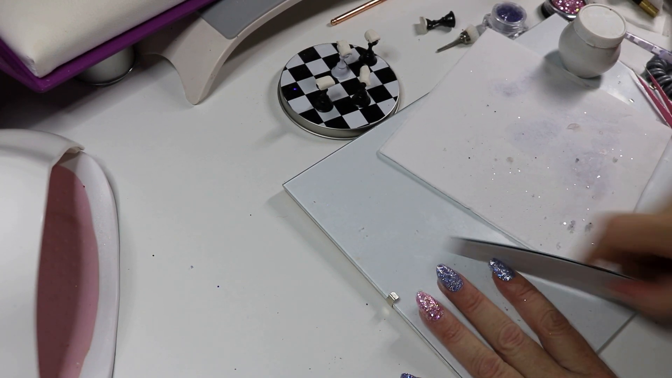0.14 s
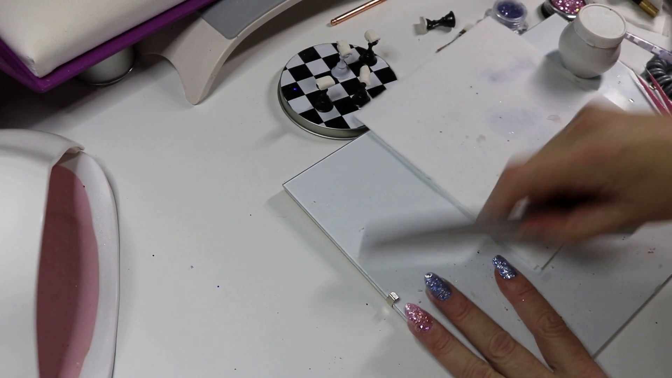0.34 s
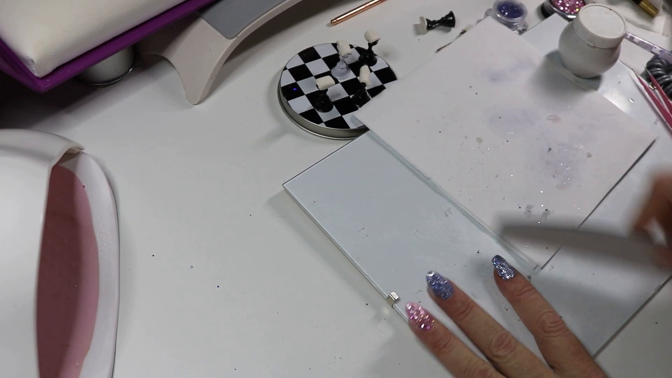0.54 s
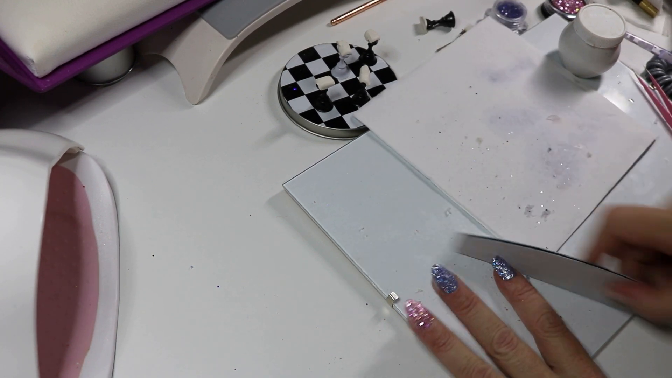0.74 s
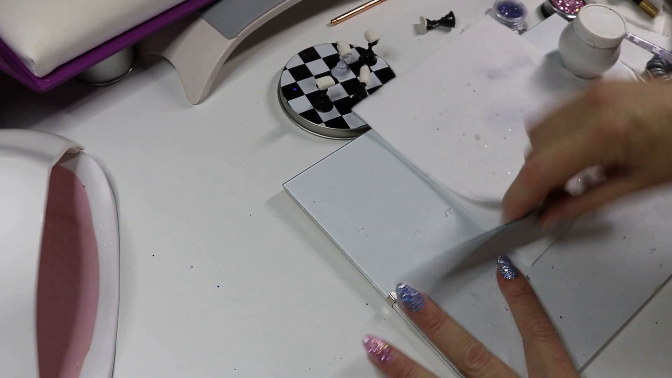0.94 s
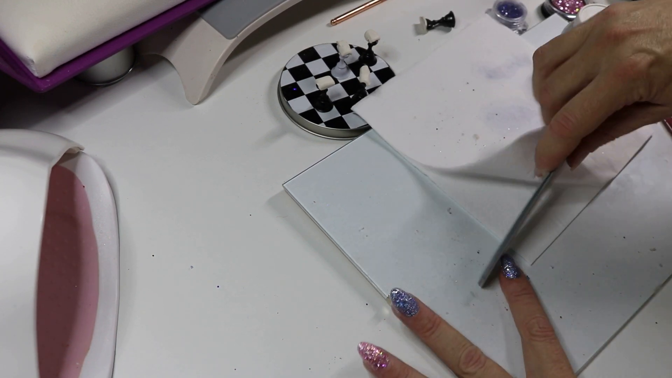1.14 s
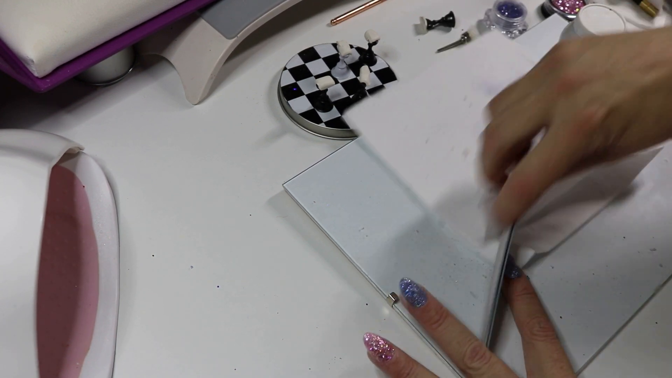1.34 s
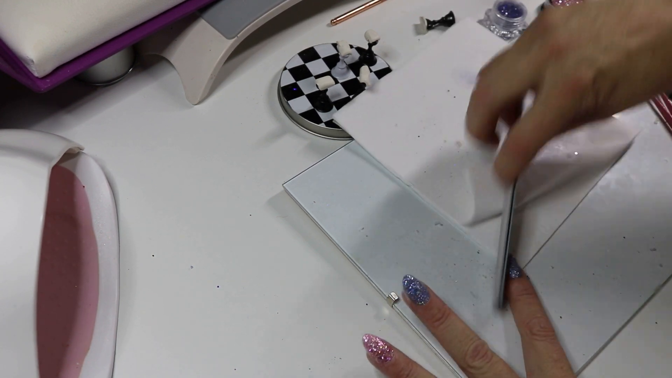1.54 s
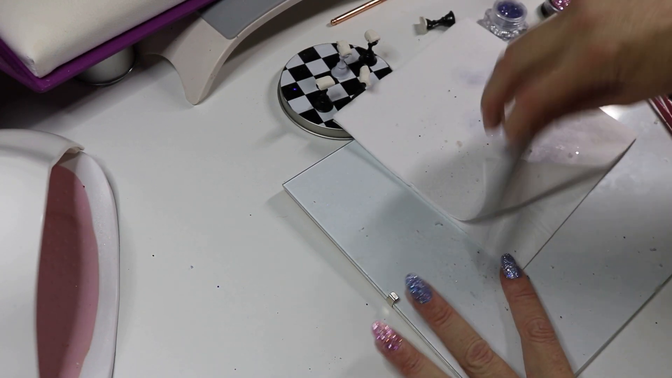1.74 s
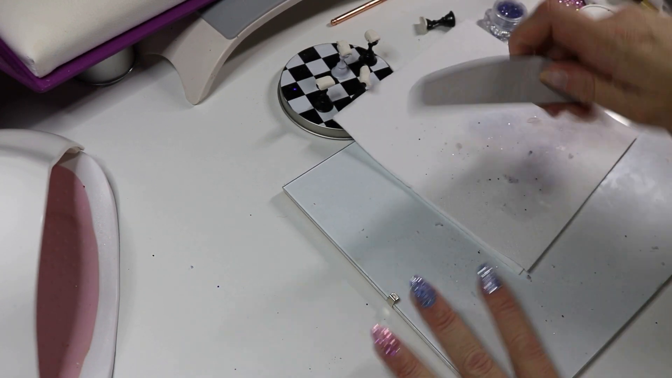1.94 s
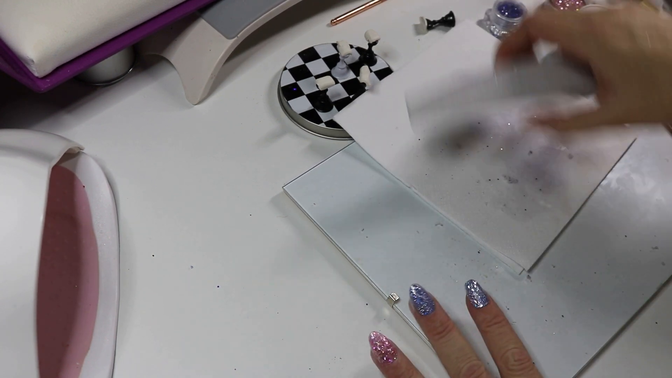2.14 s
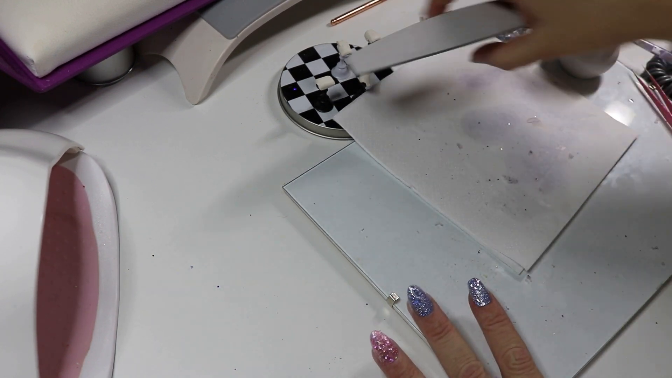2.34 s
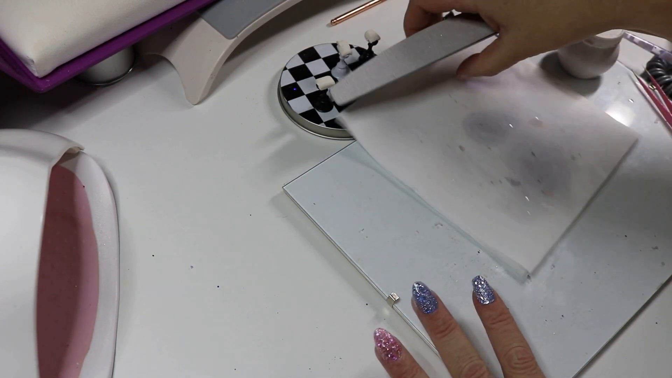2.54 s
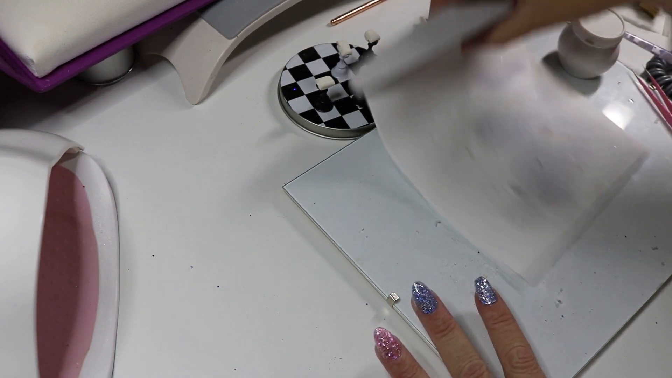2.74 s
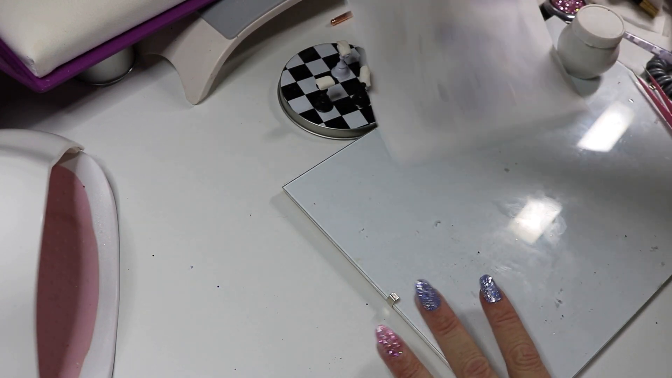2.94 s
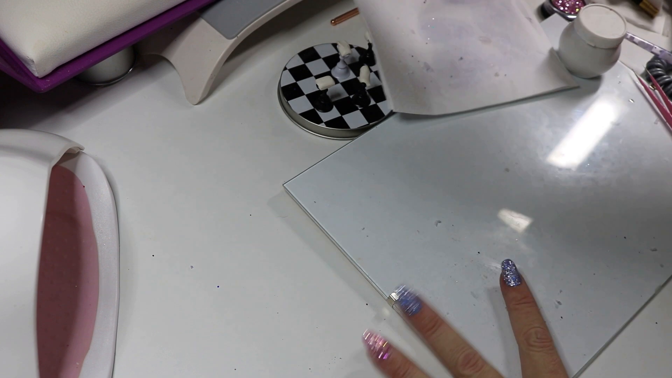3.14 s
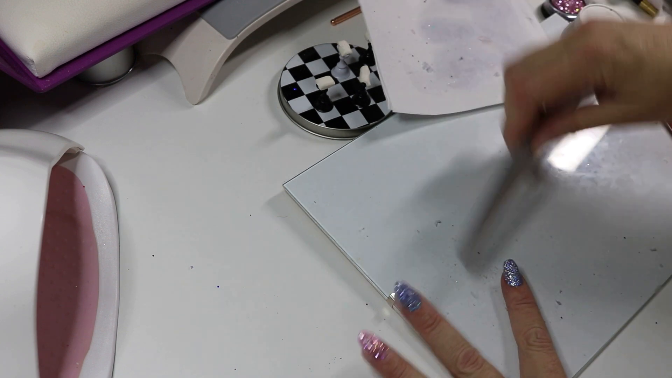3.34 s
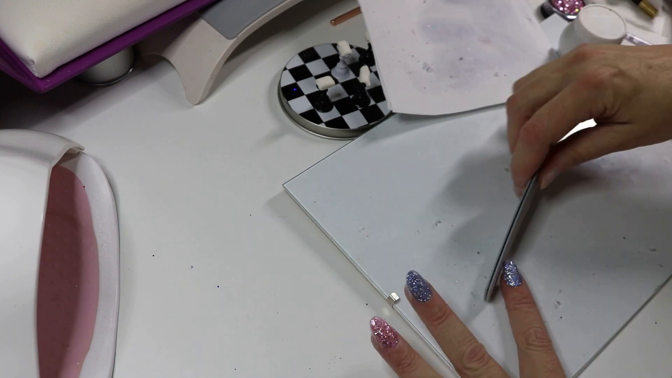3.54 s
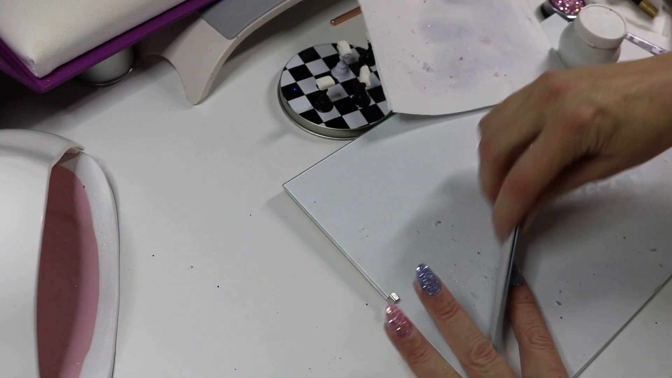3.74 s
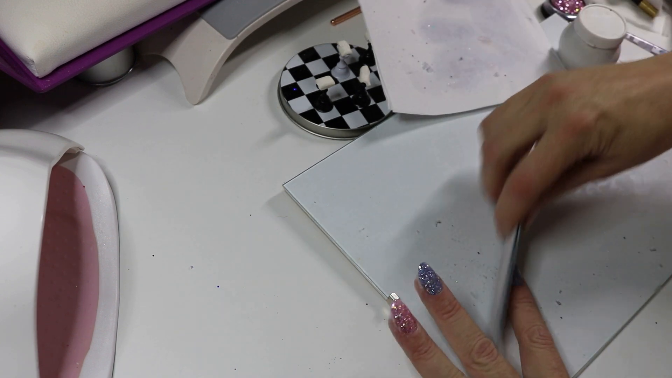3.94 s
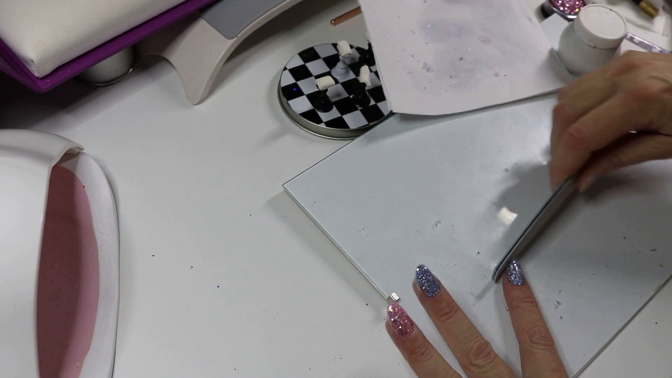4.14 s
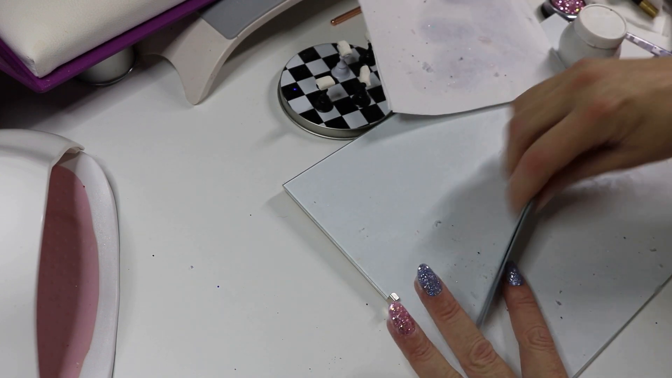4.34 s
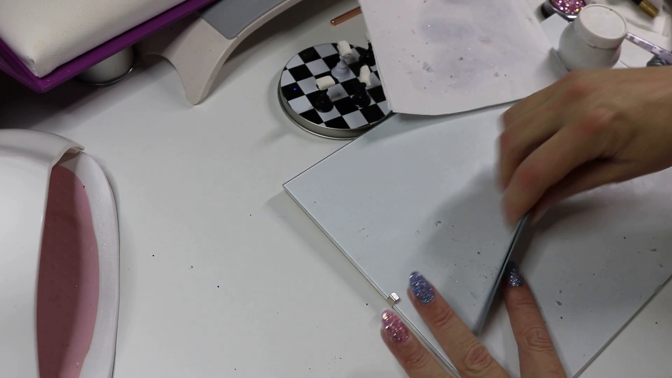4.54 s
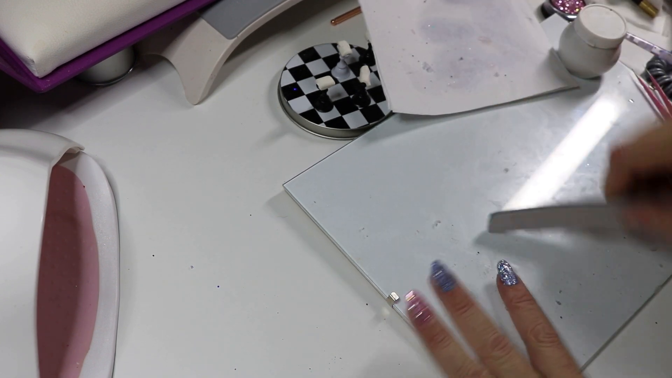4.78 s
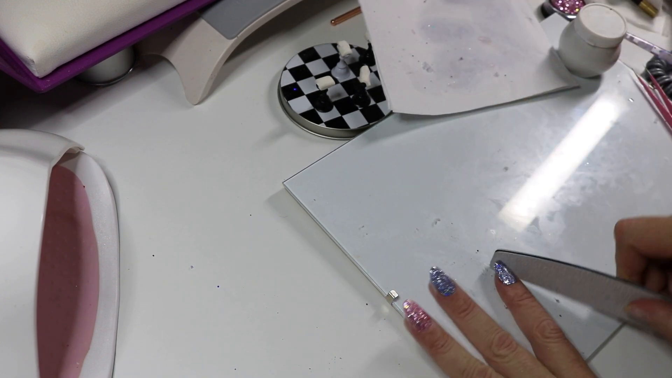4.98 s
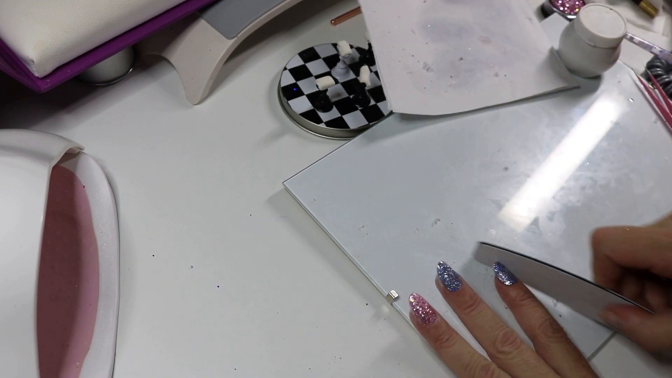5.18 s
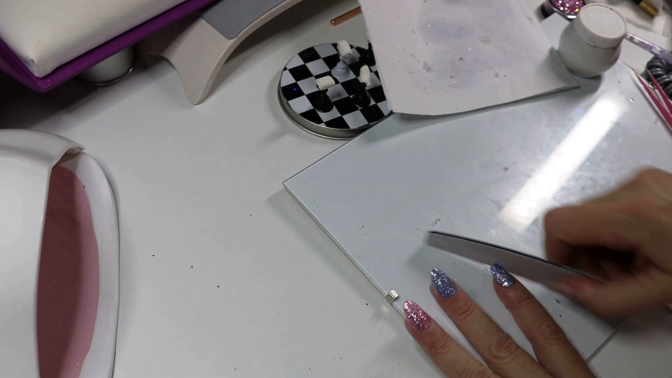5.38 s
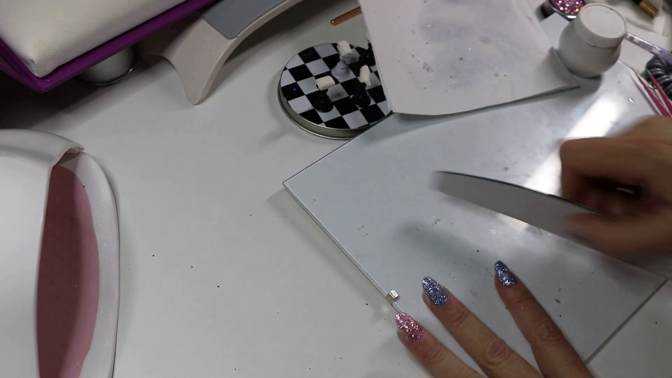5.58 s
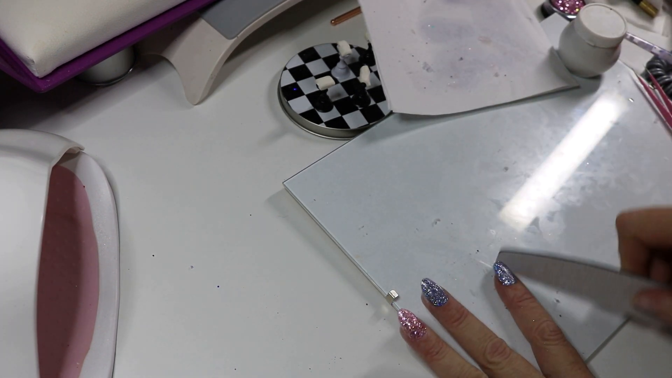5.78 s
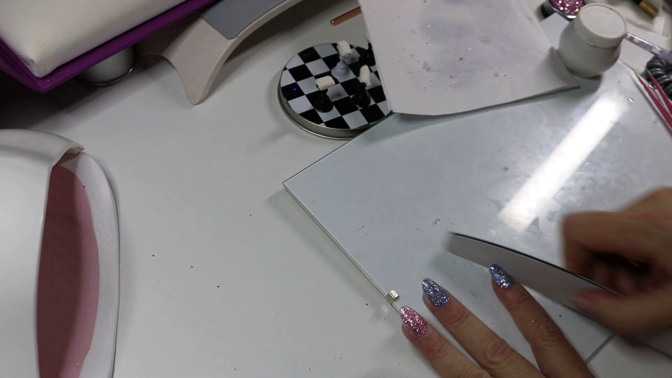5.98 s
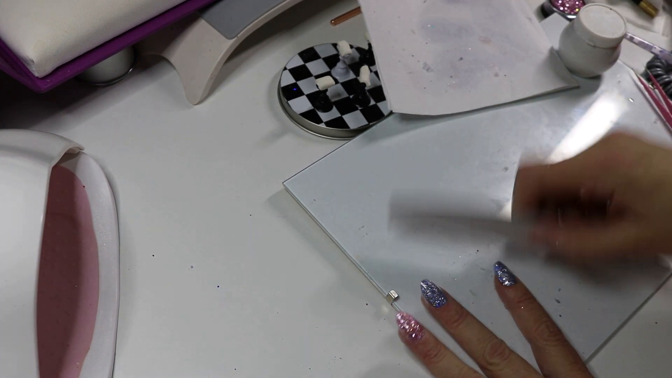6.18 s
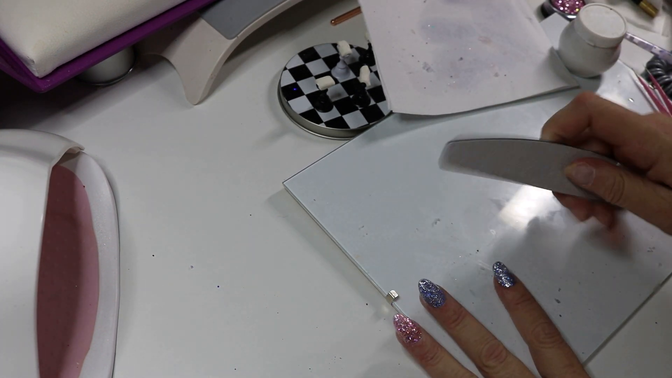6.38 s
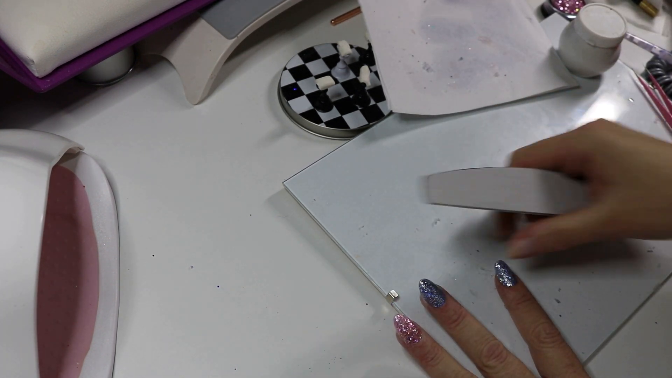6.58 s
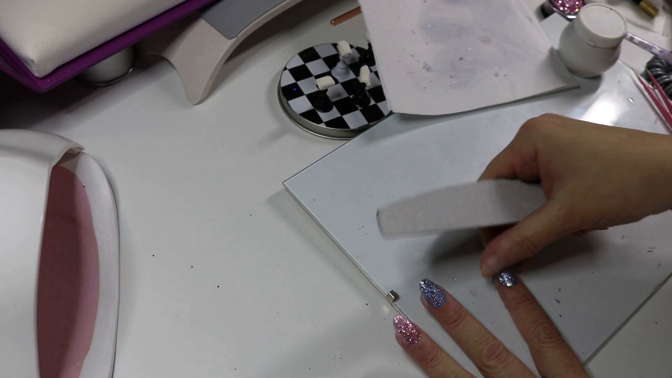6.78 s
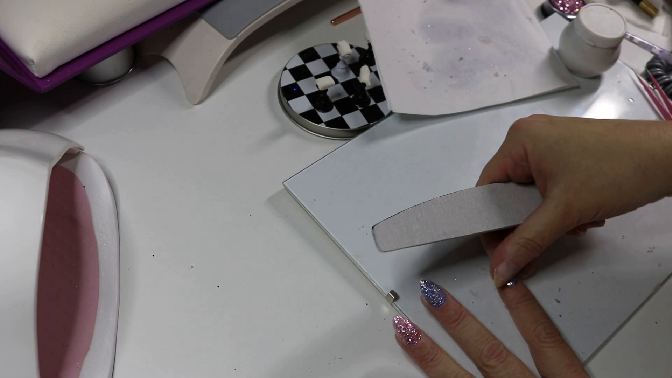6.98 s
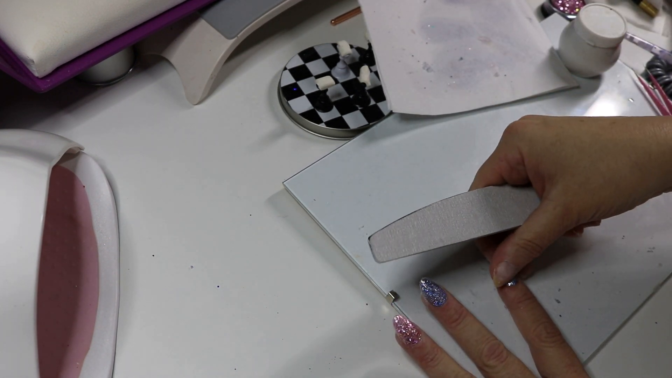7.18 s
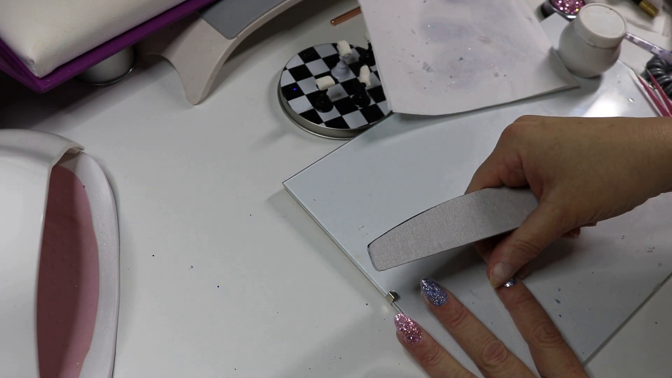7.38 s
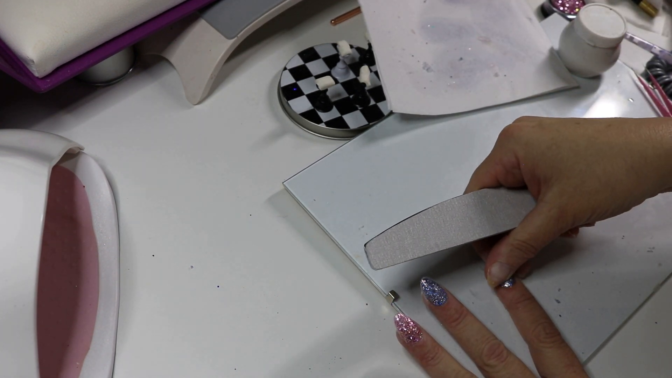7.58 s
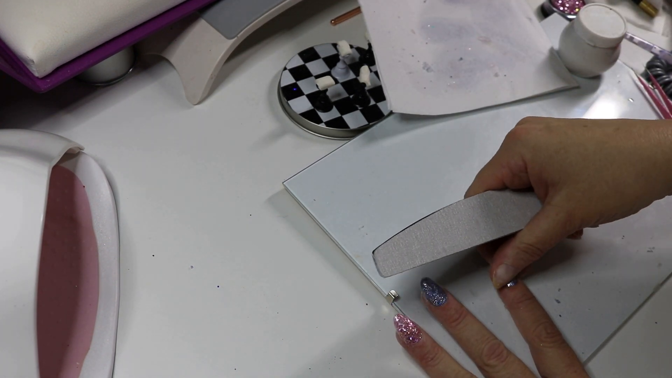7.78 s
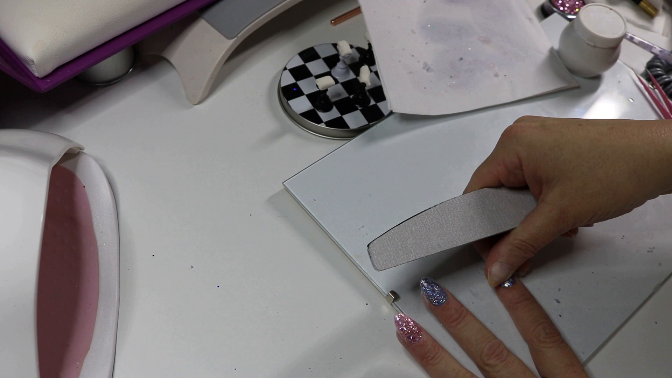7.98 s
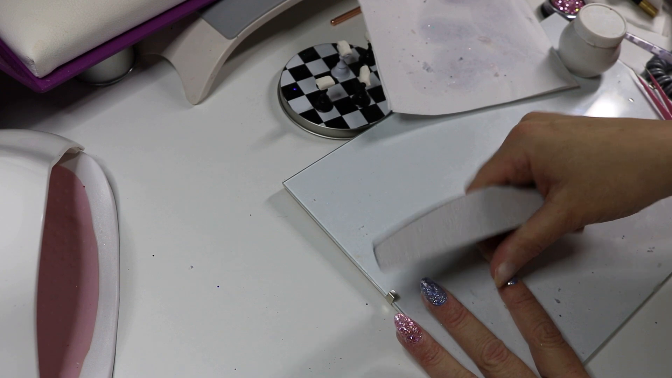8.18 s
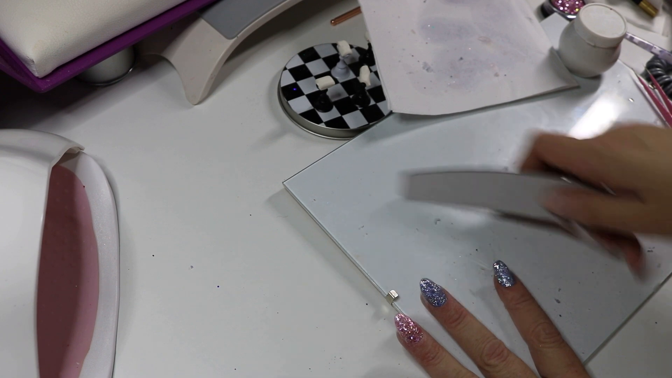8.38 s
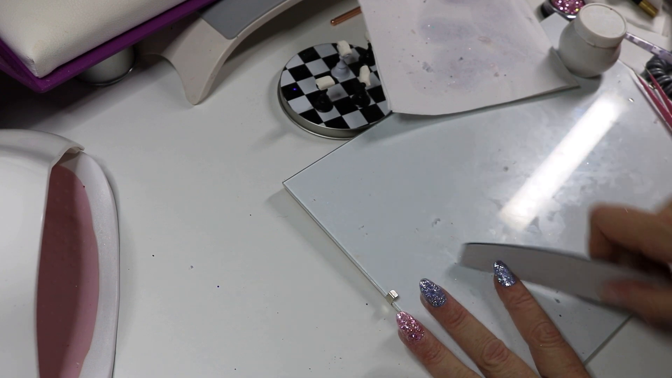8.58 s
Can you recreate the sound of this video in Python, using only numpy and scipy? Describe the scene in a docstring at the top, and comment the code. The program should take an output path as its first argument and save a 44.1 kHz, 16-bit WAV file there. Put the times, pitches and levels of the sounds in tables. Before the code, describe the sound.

Close up in a small room, a coarse hand file scrapes artificial nails in short, quick strokes, with sharp clicks and low knocks through a glass-topped table. A tiny squeak chirps near the start. A paper towel crackles as it is pushed away, more filing follows, then light airy flicks and a long pause in steady hiss before a last few clicks and scrapes.

```python
"""A gritty hand file is drawn over acrylic nails on a glass-topped table: random grain impulses make the scratch.
Coarser slips and single blows ring the modes of the table; snaps are clicks and bursts through resonances.
The file squeaks once as a gliding harmonic tone; a paper towel and light flicks are coloured grain noise.
Behind them lie a steady room hiss and a low hum that swells late. Two ports hear direct sound and reflections,
and a gain control slightly lowers everything after loud moments."""
import sys
import numpy as np
from scipy import signal
from scipy.fft import rfft, irfft, next_fast_len
from scipy.io import wavfile
from scipy.ndimage import uniform_filter1d

SR = 44100
rng = np.random.default_rng(int(sys.argv[2]) if len(sys.argv) > 2 else 0)


def wrap_up_sound(samples):
    """Save the sound to the file named by the first command line argument, as 16-bit audio."""
    columns = np.atleast_2d(samples).T
    # keep every value between -1 and 1, then stretch to whole-number steps
    tamed = np.clip(columns, -1, 1)
    steps = np.round(tamed * 32767).astype(np.int16)
    wavfile.write(sys.argv[1], SR, steps)


N = 380141  # length [samples]

# File strokes: (start [s], length [s], rise [s], fall [s], level change along the stroke [dB],
# scratch level [dB], fizz level [dB], push on the table before coupling [dB],
# knocking in the file before coupling [dB], resonance of the file body [Hz])
STROKES = [(0.0, 0.086, 0.0013, 0.092, -11, -42.5, -44, -43.5, -37.5, 413),
           (.12, 0.26, 0.083, 0.031, -1.5, -40, -41.5, -45.5, -39, 537),
           (.41, 0.32, 0.045, 0.053, -10, -72, -82, -60.5, -60, 500),
           (.7, 0.25, 0.077, 0.017, -4, -40, -41.5, -47, -45, 490),
           (.96, 0.27, 0.035, 0.24, 3.5, -33.5, -40.5, -40.5, -41.5, 530),
           (1.24, 0.24, 0.065, 0.086, -11, -38.5, -45.5, -38.5, -34, 480),
           (1.49, 0.23, 0.055, 0.13, -8, -40, -48, -48, -50, 490),
           (1.77, 0.07, 0.015, 0.011, -5, -45.5, -51.5, -71, -69, 510),
           (1.855, 0.076, 0.018, .03, -17, -55, -54.5, -70, -70, 500),
           (1.935, 0.14, 0.018, 0.12, -8, -42.5, -44.5, -45, -50, 547),
           (3.56, 0.34, 0.12, 0.14, 7.5, -43.5, -50.5, -42, -35.5, 500),
           (3.94, 0.3, 0.052, 0.14, -6.5, -44, -48, -45.5, -43.5, 470),
           (4.265, .25, 0.075, 0.075, -7, -43.5, -48, -39.5, -36.5, 451),
           (4.53, 0.218, 0.053, 0.069, 12, -43.5, -47.5, -42.5, -41, 458),
           (4.79, 0.085, 0.032, 0.027, -1, -48, -47, -74, -51.5, 505),
           (5.15, 0.39, 0.036, 0.028, 9, -52.5, -57, -53.5, -46.5, 570),
           (5.87, 0.39, 0.15, 0.063, -8, -47, -48.5, -49, -46.5, 573),
           (8.38, 0.047, 0.016, .015, 0, -58, -48.5, -78, -71, 470),
           (8.49, 0.083, 0.018, .03, 4, -49.5, -50.5, -43.5, -61, 433),
           (8.59, 0.036, .012, .02, -3, -37.5, -53, -60, -56, 445)]
# Treble spectrum of fine grains, for file and paper: (frequency [Hz], relative density [dB per Hz])
FIZZ = [(3000, -69.5), (5000, -37), (6500, -4.5), (8000, 7), (9800, 7.5), (12000, 0), (14500, -7),
        (16000, -15)]


def gain_of(db):
    """Level law: an amplitude ratio is ten to the power of decibels over 20."""
    return 10 ** (np.asarray(db) / 20)


def evened(x):
    """Normalization: scales a signal to rms 1."""
    return x / np.sqrt(np.mean(x ** 2) + 1e-20)


def read(points, hz):
    """Log-frequency interpolation: reads a tabulated spectrum at any frequency."""
    f, value = np.transpose(points)
    return np.interp(np.log(hz + 1), np.log(f + 1), value)


def add(mix, s, sound):
    """Superposition: adds a sound into the mix at s seconds."""
    part = mix[round(s * SR):][:len(sound)]
    part += sound[:len(part)]


def filtered(x, gain):
    """Linear filtering: multiplies the spectrum by gain(hz)."""
    size = next_fast_len(N)
    hz = np.fft.rfftfreq(size, 1 / SR)
    return irfft(rfft(x, size) * gain(hz), size)[..., :N]


def coloured(x, spectrum):
    """Spectral shaping: filters x by a tabulated spectrum, then scales to rms 1."""
    return evened(filtered(x, lambda hz: gain_of(read(spectrum, hz))))


def resonate(x, hz, width):
    """Resonance by heterodyning: shifts hz to zero, smooths over width [Hz] and shifts back; peak gain 1."""
    turn = np.exp(2j * np.pi * np.cumsum(hz * np.ones(x.shape[-1])) / SR)
    r = np.exp(-np.pi * width / SR)
    smooth = signal.lfilter([1 - r], [1, -r], x / turn + 1e-18)
    return 2 * (turn * smooth).real


def level(rows, order, edge=0.83):
    """Amplitude envelope: each row swells, drifts and fades; column order is its level."""
    edge_db = -31 * edge  # level of the ends against the middle
    out = np.zeros(N)
    for row in rows:
        start, length, rise, fall, drift_db = row[:5]
        t = np.arange(0, length, 1 / SR)
        onset = np.clip(1 - t / max(rise, 1e-3), 0, 1) ** 2
        ending = np.clip(1 - (length - t) / max(fall, 1e-3), 0, 1) ** 2
        drift = drift_db * (t / length - .5)
        add(out, start, gain_of(row[order] + edge_db * (onset + ending) + drift))
    return out


def pitch(rows):
    """Moving resonance: the last column [Hz] of the latest row, joined by short glides."""
    rows = np.array(rows)
    latest = np.maximum(np.searchsorted(rows[:, 0], np.arange(N) / SR) - 1, 0)
    return uniform_filter1d(rows[latest, -1], size=800)


def grit(per_s, spread_db, clump_db):
    """Shot noise: grains catch one by one in clumps, a few large; the two rows differ in sign only."""
    clumps = evened(uniform_filter1d(rng.standard_normal(N), size=200))  # some milliseconds long
    size = gain_of(spread_db * np.minimum(rng.exponential(1, N), 5) + clump_db * clumps)
    sign = rng.choice([-1., 1.], (2, N))
    return evened(size * sign * (rng.random(N) < per_s / SR))


def patchy(x):
    """Spectral modulation: a wandering contact tints patches about 2 kHz wide and 40 ms long."""
    z = signal.stft(x, nperseg=256, noverlap=192)[2]
    patches = rng.standard_normal(z.shape[1:])
    patches = uniform_filter1d(uniform_filter1d(patches, size=12, axis=0), size=28, axis=1)
    z = z * gain_of(1.2 * evened(patches))
    return evened(signal.istft(z, nperseg=256, noverlap=192)[1][:, :N])


def room_tone():
    """Partial coherence: steady hiss with a bass partly common to both channels, plus a sinusoidal hum."""
    # Hiss spectrum: (frequency [Hz], relative density [dB per Hz])
    hiss = [(12, -28), (20, -3), (70, -8.5), (93, -10.5), (172, -10), (216, -7), (347, -9), (434, -11.5),
            (624, -12), (678, -12.5), (1220, -14), (1480, -13.5), (1610, -14.5), (9000, -22.5),
            (13500, -28), (16000, -31)]
    # Likeness of the channels: (frequency [Hz], correlation [0 to 1])
    likeness = [(60, 0.52), (180, 0.38), (550, 0.18), (1650, 0), (4970, 0), (15000, 0)]
    # Swelling of the hum: (time [s], level [dB])
    swell = [(7.15, -74), (7.36, -58), (7.63, -77), (8.18, -59), (8.54, -52.5), (8.62, -65)]
    hiss_db, hum_hz = -51.5, 67.5
    left, other = rng.standard_normal((2, N))
    same = lambda hz: np.clip(read(likeness, hz), -1, 1)
    right = filtered(left, same) + filtered(other, lambda hz: np.sqrt(1 - same(hz) ** 2))
    s, db = np.transpose(swell)
    t = np.arange(N) / SR
    hum = gain_of(np.interp(t, s, db, left=-200)) * np.sin(2 * np.pi * hum_hz * t)
    return gain_of(hiss_db) * coloured(np.array([left, right]), hiss) + hum


def paper():
    """Fibre crackle: clumped impulses excite a resonance that moves as the towel slides and folds."""
    # Slides and folds: (start [s], length [s], rise [s], fall [s], level change [dB],
    # rustle level [dB], fizz level [dB], centre [Hz])
    folds = [(2.52, .1, 0.018, 0.018, 3, -53, -64, 3400), (2.618, 0.078, .014, 0.07, -6, -40.5, -53, 3170),
             (2.885, 0.12, 0.062, .01, -3, -43.5, -52.5, 2640),
             (2.995, 0.085, .02, 0.032, 0, -45.5, -68, 2600),
             (3.05, 0.059, .035, .02, 0, -52.5, -50.5, 3240), (3.178, .11, .004, .05, 7, -45.5, -64, 2630),
             (3.28, 0.17, 0.036, 0.11, -4, -57.5, -52.5, 3250)]
    # Rustle spectrum: (frequency [Hz], relative density [dB per Hz])
    rustle_spectrum = [(410, -6.5), (700, -10.5), (1150, -8), (1250, -4), (1590, -4), (2010, -6.5),
                       (2710, -5.5), (4080, -6), (6500, -11.5), (8450, -18), (14300, -120)]
    grains = patchy(grit(per_s=9900, spread_db=1.5, clump_db=1.0))
    rustle = coloured(grains, rustle_spectrum)
    rustle = evened(rustle + 0.56 * evened(resonate(rustle, pitch(folds), 550)))
    return level(folds, order=5) * rustle + level(folds, order=6) * coloured(grains, FIZZ)


def flicks():
    """Light friction: dry passes over the nail hiss, with a narrow resonant scratch from the file edge."""
    # Passes: (start [s], length [s], rise [s], fall [s], level change [dB],
    # hiss level [dB], edge scratch level [dB], edge pitch [Hz])
    passes = [(6.286, 0.089, 0.0027, .01, -16, -43.5, -53, 4170),
              (6.359, 0.047, 0.0034, .02, -4, -46.5, -66, 4660),
              (6.401, 0.062, .015, 0.028, 2, -42.5, -62, 4700),
              (6.471, 0.019, 0.0053, .008, -2, -40.5, -57, 3840),
              (6.492, .02, 0.0055, .01, 3, -50, -60, 4160), (6.53, 0.047, 0.0045, .015, -6, -43, -64, 4460),
              (6.568, .065, .015, .025, 0, -49.5, -56, 3840)]
    # Hiss spectrum: (frequency [Hz], relative density [dB per Hz])
    hiss_spectrum = [(2650, -13), (4500, -2.5), (4700, -3), (7370, -2.5), (9870, 0.5), (14500, -12),
                     (16000, -16)]
    grains = grit(per_s=20000, spread_db=0.5, clump_db=1.5)
    hz = pitch(passes)
    edge = evened(resonate(resonate(grains, hz, 710), hz, 1400))
    hiss = coloured(grains, hiss_spectrum)
    return level(passes, order=5) * hiss + level(passes, order=6) * edge


def snaps():
    """Impulse response: file edge or paper gives a click and a dying burst, both through a resonance."""
    # Snaps: (time [s], peak level [dB], centre [Hz], burst t60 [s], click against burst before filtering [dB])
    events = [(0.352, -24.5, 2160, 0.053, -2), (0.645, -30.5, 6300, 0.09, 13.5),
              (0.6678, -15, 1960, 0.024, 26), (0.7621, -20, 1980, 0.017, 13), (1.066, -18, 4500, 0.06, 5),
              (1.077, -14.5, 3400, 0.05, -1), (1.243, -39, 1500, .02, 16), (1.3927, -21.5, 4260, 0.087, 20),
              (1.491, -25, 1790, 0.049, -2), (1.825, -27, 5240, 0.014, 5), (1.939, -27.5, 2450, 0.018, 11),
              (1.9548, -20.5, 2970, 0.011, 6), (1.9757, -26.5, 3080, 0.011, 9),
              (2.075, -32, 5040, 0.013, 7), (2.0817, -25.5, 5440, 0.014, 4.5),
              (2.543, -37, 3700, 0.0095, 12), (2.5702, -33, 3530, 0.026, 19),
              (2.604, -30.5, 4830, 0.027, 9), (2.6282, -31.5, 3370, 0.042, 8),
              (2.7115, -31.5, 3200, 0.014, 11), (2.8817, -37.5, 2700, .02, 16),
              (3.1781, -18.5, 1840, 0.027, 20), (3.2287, -21, 3270, 0.0085, 10),
              (3.229, -19, 7200, 0.0093, 19), (3.255, -32, 3200, 0.012, 15),
              (3.277, -24.5, 7400, 0.016, 12), (3.4772, -32.5, 2440, 0.009, 9),
              (3.487, -21, 10500, 0.012, 13), (3.646, -19, 10100, .024, 12), (3.7109, -15, 10300, 0.016, 9),
              (3.985, -24.5, 4030, 0.013, 11), (4.0068, -30, 2930, 0.039, 19),
              (4.2698, -35, 2030, 0.014, 22), (4.282, -24, 8050, 0.0086, 16),
              (4.3168, -20, 8000, 0.0095, 21), (4.3934, -22, 9600, 0.02, 9), (4.4854, -36, 3300, 0.013, 12),
              (4.835, -27, 9100, 0.009, 8), (4.849, -22, 9100, 0.01, 9), (4.898, -26.5, 8500, .015, 12),
              (4.962, -30, 8500, 0.025, 9), (5.5882, -29, 9000, 0.013, 10), (6.204, -23, 8800, 0.018, 9),
              (6.695, -40.5, 2500, .01, 14), (8.379, -20.5, 10000, 0.0093, 5.5),
              (8.379, -35, 4300, 0.014, -10), (8.4483, -27, 2190, 0.0081, 11), (8.5244, -38, 2400, .02, 16),
              (8.5403, -23.5, 3460, 0.012, 13)]
    out, t = np.zeros(N), np.arange(3000) / SR
    bursts = rng.standard_normal((len(events), 3000))
    for (s, db, hz, t60, click_db), noise in zip(events, bursts):
        burst = noise * gain_of(-60 * t / t60) * np.minimum(t / .002, 1)
        tone = burst + gain_of(click_db) * (t == 0)
        for relative_width in (0.8, 1.3, 1.3):
            tone = resonate(tone, hz, relative_width * hz)
        add(out, s, gain_of(db) * tone / abs(tone).max())
    return out


def squeak():
    """Stick-slip oscillation: a harmonic tone falls in pitch, the nail tip whistles and the nail resonates."""
    # Glide: (time [s], fundamental [Hz], level before partial weighting [dB], whistle level [dB])
    glide = [(0.936, 1940, -31, -50), (0.941, 1946, -33, -29), (0.947, 1790, -13.5, -15),
             (0.9475, 1520, -18, -29), (0.95, 1298, -10, -32), (0.956, 1330, -14.5, -35),
             (0.96, 1330, -39, -68), (.964, 1330, -42, -60)]
    # Partials: (multiple of the fundamental, relative level [dB])
    partials = [(1, -9.5), (2, -21), (3, -38), (4, -39)]
    # Nail resonances: (frequency [Hz], width [Hz], gain [dB])
    nail = [(1330, 50, 8), (2630, 620, 12.5), (6300, 2000, 11)]
    whistle_hz = 4260
    s, hz, db, whistle_db = np.transpose(glide)
    t = np.arange(N) / SR
    turns = np.cumsum(np.interp(t, s, hz)) / SR
    strength = gain_of(np.interp(t, s, db, left=-200, right=-200))
    tone = strength * sum(gain_of(d) * np.sin(2 * np.pi * k * turns) for k, d in partials)
    whistle_gain = gain_of(np.interp(t, s, whistle_db, left=-200, right=-200))
    whistle = whistle_gain * np.sin(2 * np.pi * whistle_hz * t)
    rub = tone + .2 * strength * rng.standard_normal(N)
    return tone + whistle + sum(gain_of(d) * resonate(rub, f, w) for f, w, d in nail)


def table(soft, hard):
    """Modal synthesis: soft pushes ring the six lowest modes of the table, hard pushes the others."""
    # Modes: (frequency [Hz], relative level [dB], t60 [s])
    mode_rows = [(111, -6, 0.11), (176, -14, 0.45), (238.4, 4.5, 0.3), (253, -11.5, 0.71),
                 (283.1, -2.5, 0.27), (301.5, -2.5, 0.17), (389, -12.5, 0.033), (429, -7.5, 0.073),
                 (530, -12, 0.075), (608, -34, 0.13), (650, -23.5, 0.19), (790, -24, 0.3), (830, -38, 0.36)]
    t = np.arange(SR // 2) / SR
    modes = [gain_of(db - 60 * t / t60) * np.sin(2 * np.pi * hz * t) for hz, db, t60 in mode_rows]
    low = signal.oaconvolve(soft, sum(modes[:6]))[:N]
    high = signal.oaconvolve(hard, sum(modes[6:]))[:N]
    return low + high


def knocks():
    """Impact excitation: finger or file strikes the table once, and the file rattles briefly after it."""
    # Blows: (time [s], strength before coupling [dB], hardness: upper-mode drive relative to strength [dB])
    blows = [(0.002, -35.5, 2), (0.645, -29.5, 8), (0.6671, -16.5, 13), (0.757, -26, 16.5), (0.85, -27, 3),
             (0.956, -22.5, 3), (1.007, -26, 4), (1.237, -44, 23.5), (1.262, -24, 3), (1.28, -27.5, 2),
             (1.331, -33, -8), (1.305, -20, -9), (1.742, -30, 3), (1.939, -27.5, 5.5), (2.064, -37.5, -8),
             (2.571, -42.5, 3), (3.178, -27.5, 18), (3.477, -22, 4), (3.695, -23, -13), (3.985, -39, -13),
             (4.008, -27.5, 13.5), (4.269, -35.5, 11), (4.281, -25, -5), (4.307, -19.5, -12),
             (4.655, -28, -6), (4.946, -26.5, 11), (5.233, -37, 0), (5.491, -48, -10), (5.759, -39, -14),
             (5.849, -29.5, -29), (6.001, -37, -14), (6.196, -37, -6), (6.695, -38.5, 4), (8.257, -36.5, 0),
             (8.448, -25, 10.5), (8.525, -25.5, -21.5), (8.547, -28.5, 3)]
    soft, hard = np.zeros((2, N))
    for s, db, hard_db in blows:
        add(soft, s, gain_of([db - 9.5]))
        add(hard, s, gain_of([db + hard_db - 17.0]))
    t = np.arange(4000) / SR
    decay = gain_of(9.5 - 60 * t / 0.11)
    rattle = signal.oaconvolve(hard, decay)[:N] * rng.standard_normal(N)
    return table(soft, hard) + resonate(resonate(rattle, 410, 450), 410, 900)


def drumming():
    """Structure-borne sound: coarse stick and slip shakes the file body and drives the table modes."""
    slips = grit(per_s=1500, spread_db=3.0, clump_db=-2.0)[0]
    soft = gain_of(-30) * level(STROKES, order=7, edge=0.76) * slips
    knocking = level(STROKES, order=8, edge=0.47) * slips
    body_hz = pitch(STROKES)  # moves with the free length of the file
    body = gain_of(16) * resonate(resonate(knocking, body_hz, 85), body_hz, 310)
    return body + table(soft, gain_of(-23.5) * knocking)


def rasp():
    """Abrasive friction: grit scratches as coloured impulses, its fizz wobbling with the hand pressure."""
    # Scratch spectrum: (frequency [Hz], relative density [dB per Hz])
    scratch_spectrum = [(500, 0), (900, -13.5), (1400, -4.5), (2200, -7.5), (3300, -5.5), (4800, -9.5),
                        (6500, -11), (9000, -32.5)]
    grains = patchy(grit(per_s=15000, spread_db=2.5, clump_db=1.0))
    wobble = rng.standard_normal(N)
    wobble = evened(uniform_filter1d(uniform_filter1d(wobble, size=700), size=700))
    scratch = level(STROKES, order=5, edge=0.58) * coloured(grains, scratch_spectrum)
    fizz = level(STROKES, order=6, edge=0.57) * coloured(grains, FIZZ)
    return scratch + gain_of(2.0 * wobble) * fizz


def rubbing():
    """Extended source: a long rubbing edge reaches the two ports partly alike and partly opposed."""
    # Opposed part: (frequency [Hz], amplitude share [0 to 1])
    unlike = [(800, 0.35), (2000, 0.77), (5000, 0.56), (12000, 0.66)]
    common, opposed = rasp() + paper() + flicks()
    share = lambda hz: np.clip(read(unlike, hz), 0, 1)
    common = filtered(common, lambda hz: np.sqrt(1 - share(hz) ** 2))
    opposed = filtered(opposed, share)
    return np.array([common + opposed, common - opposed])


def unboomed(x):
    """Radiation efficiency: small sources radiate little deep bass, hence a high-pass at 150 Hz."""
    return signal.sosfilt(signal.butter(4, 150, "high", fs=SR, output="sos"), x)


def heard(x):
    """Direct and reflected sound: the right port hears first; table top and walls add unlike echoes."""
    # Hands right of the ports: (frequency [Hz], left minus right [dB])
    lean_points = [(60, -3), (180, 0), (550, 0), (1650, -3), (4970, -2), (15000, -2)]
    # Reflections against direct sound: (frequency [Hz], level before a ceiling of -5 dB [dB])
    wet_points = [(200, -33), (600, 2), (1500, 4.5), (4000, -7), (10000, 11)]
    lean = lambda hz: gain_of(np.outer([.5, -.5], read(lean_points, hz)))
    delay_s = [.00005, 0]  # left, right
    direct = filtered(x, lambda hz: lean(hz) * np.exp(-2j * np.pi * np.outer(delay_s, hz)))
    t, wet = np.arange(SR // 5) / SR, np.zeros((2, N))
    # four random sets of echoes crossfade in turn every 30 ms, keeping the reflections diffuse
    turn = np.arange(N) / SR / .03
    for k in range(4):
        sign = rng.choice([-1., 1.], (2, len(t)))
        taps = sign * (rng.random((2, len(t))) < .06) * (t > .0003)
        taps *= gain_of(-60 * t / 0.02) + gain_of(-11 - 60 * t / 0.3)  # early and late decay
        taps /= np.linalg.norm(taps, axis=1, keepdims=True)
        distance = abs((turn - k + 2) % 4 - 2)
        share = np.cos(np.pi / 2 * np.minimum(distance, 1))  # crossfade
        wet += signal.oaconvolve(direct * share, taps, axes=1)[:, :N]
    return direct + filtered(wet, lambda hz: gain_of(np.minimum(read(wet_points, hz), -5)))


def scene():
    """Superposition: all sources on the table are heard through the air, over the room tone."""
    sources = rubbing() + drumming() + knocks() + snaps() + squeak()
    return heard(unboomed(sources)) + room_tone()


def record(dry):
    """Gain control: a peak-holding power detector lowers the gain fast and restores it slowly; then a low-pass."""
    slope = 0.084  # dB of reduction per dB above the threshold
    band_limit_hz = 15850
    power_db = 10 * np.log10(abs(uniform_filter1d((dry ** 2).mean(0), size=2000)) + 1e-12)
    fall = np.arange(N) * 35.0 / SR  # the held power sinks 35 dB per second
    held_db = np.maximum.accumulate(power_db + fall) - fall
    over_db = np.maximum(held_db + 42.5, 0)  # threshold -42.5 dB
    ducked = dry / gain_of(slope * uniform_filter1d(over_db, size=400))
    low_pass = signal.firwin(511, band_limit_hz, window=("kaiser", 9), fs=SR)
    return signal.oaconvolve(ducked, low_pass[None], "same")


dry = scene()
out = record(dry)
wrap_up_sound(out)
```